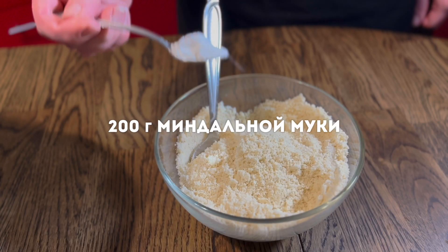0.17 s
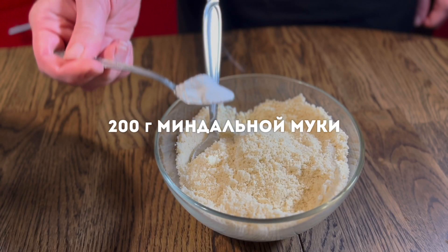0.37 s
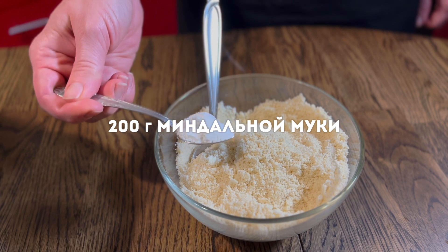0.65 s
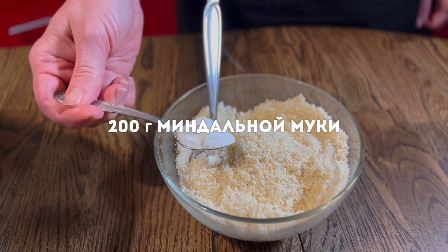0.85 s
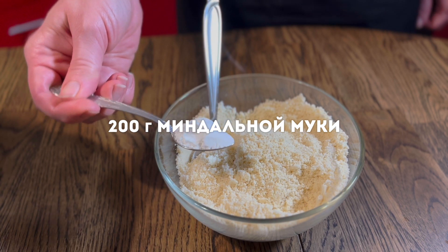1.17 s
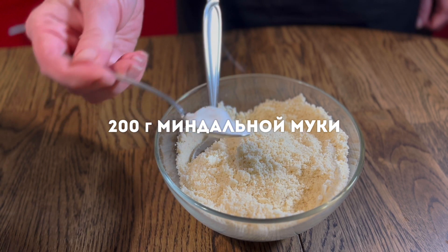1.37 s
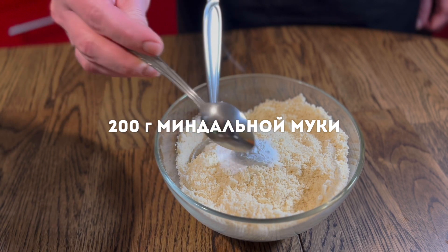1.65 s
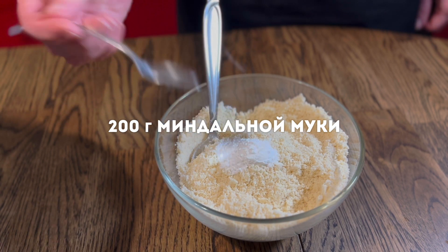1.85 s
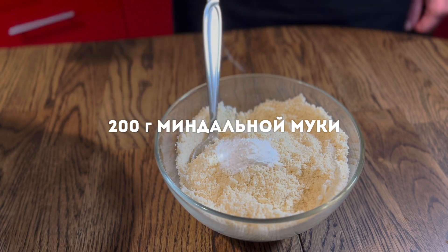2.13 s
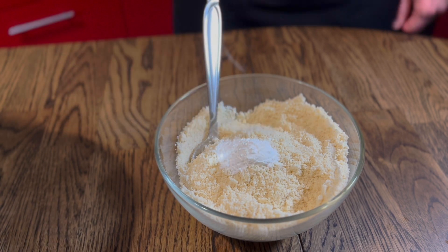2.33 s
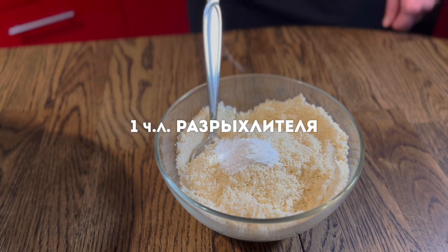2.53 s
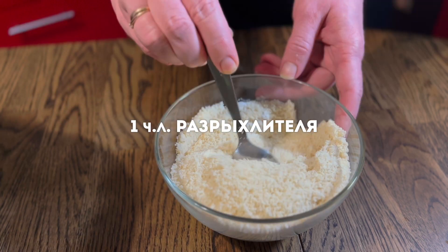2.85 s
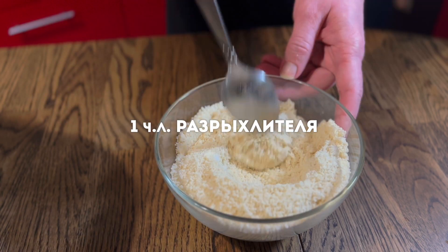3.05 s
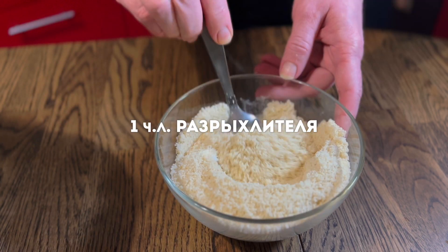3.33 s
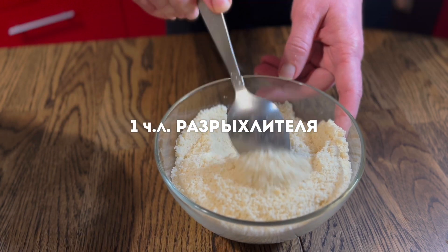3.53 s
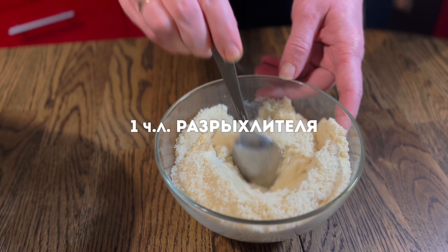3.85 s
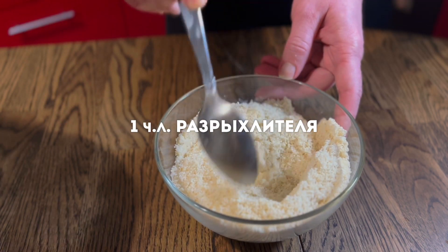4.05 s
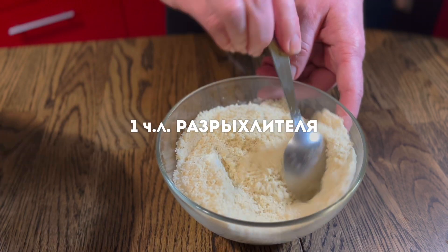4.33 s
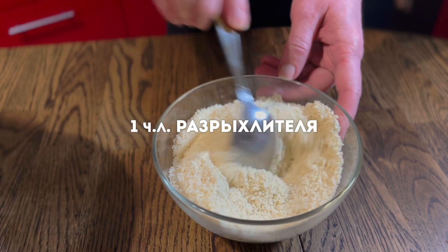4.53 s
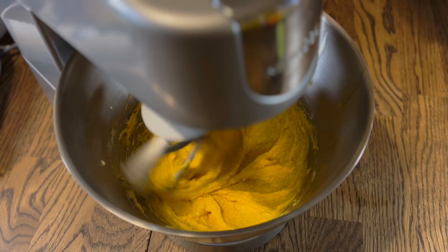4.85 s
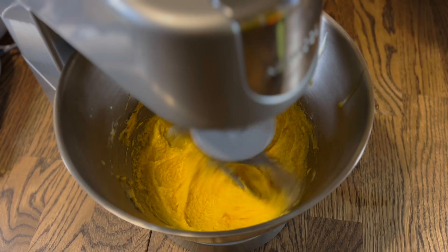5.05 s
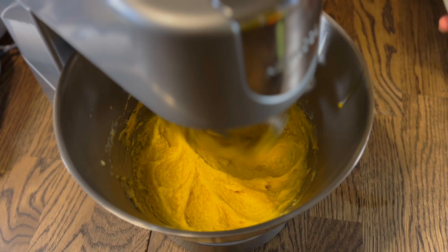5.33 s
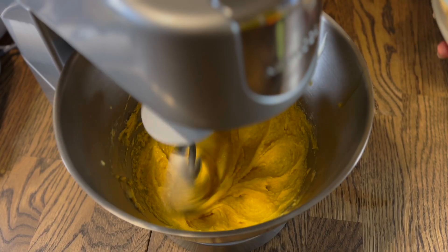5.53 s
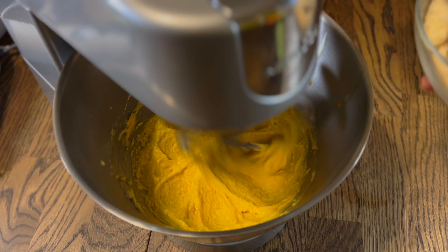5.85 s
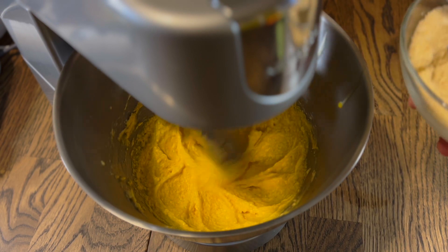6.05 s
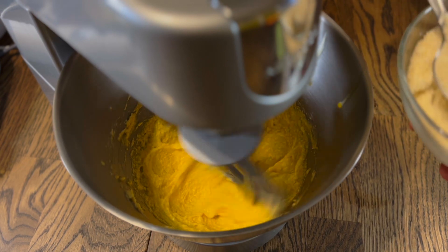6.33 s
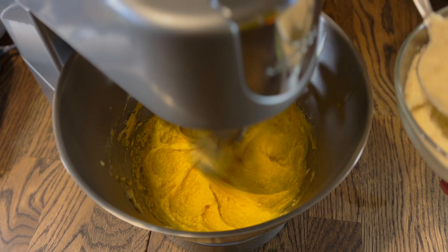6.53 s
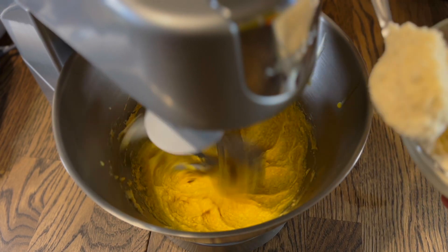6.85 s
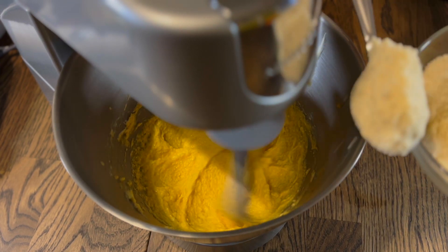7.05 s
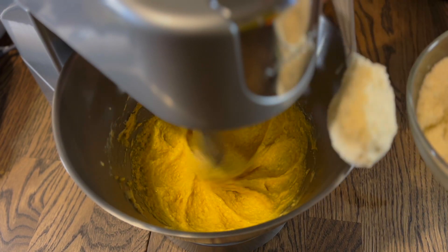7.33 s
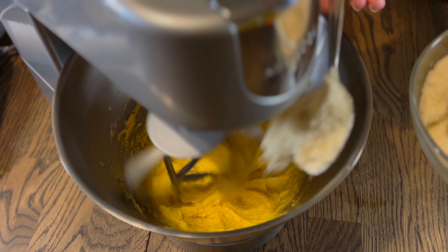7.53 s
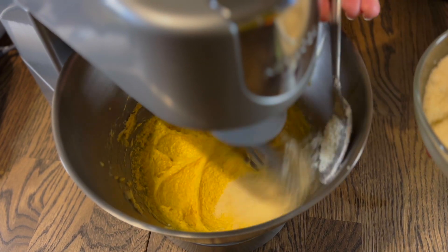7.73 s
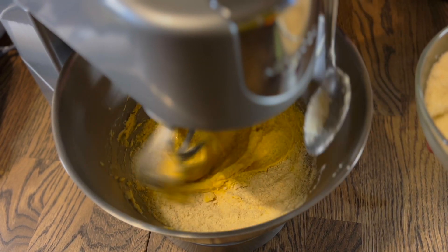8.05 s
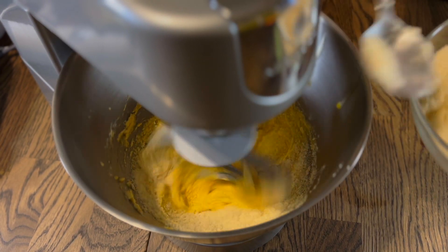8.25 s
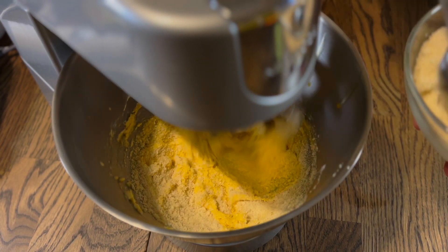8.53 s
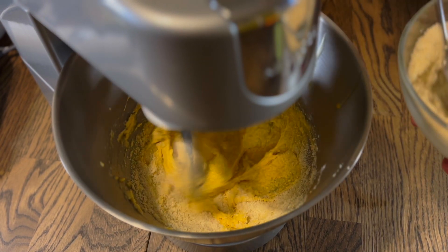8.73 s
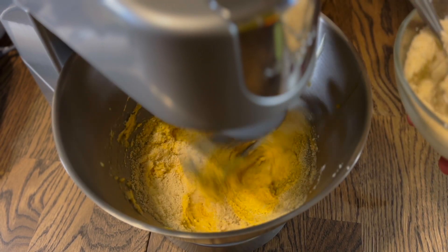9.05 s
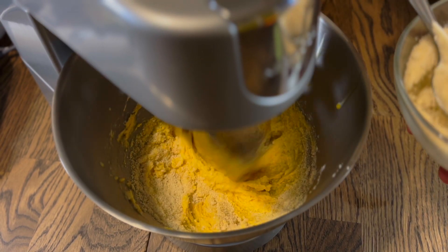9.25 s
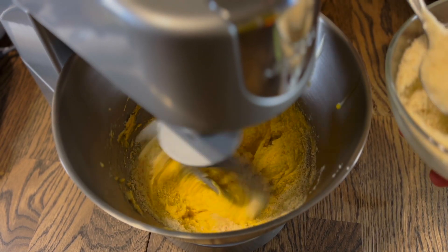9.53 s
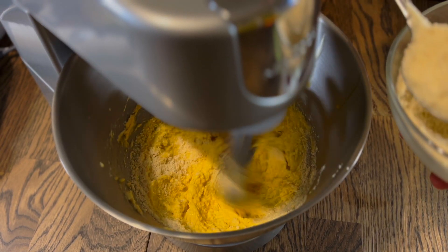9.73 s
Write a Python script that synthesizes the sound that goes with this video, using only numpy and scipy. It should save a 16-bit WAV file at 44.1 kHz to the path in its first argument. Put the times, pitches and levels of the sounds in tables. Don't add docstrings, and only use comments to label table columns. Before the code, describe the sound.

A steady mixer motor hums across the table, slightly roomy, while sparse glassy clacks, a dull knock and a bright crack come from a spoon stirring in a glass bowl. Midway the view switches suddenly to the mixer itself, close and strong, its whine and rough roar wavering under the load of batter. Thin spoon ticks on the steel rim occasionally poke through. Short indoor kitchen reverberation throughout.

```python
import sys
import numpy as np
from scipy import signal
from scipy.fft import rfft, irfft, next_fast_len
from scipy.io import wavfile
from scipy.ndimage import map_coordinates

SR = 44100
rng = np.random.default_rng(int(sys.argv[2]) if len(sys.argv) > 2 else 0)


def persist_wave(psi):
    counts = np.round(np.clip(psi, -1, 1) * 32767).astype(np.int16)
    wavfile.write(sys.argv[1], SR, np.atleast_2d(counts).T)


def voltage_ratio(level):
    return 10 ** (np.asarray(level, float) / 20)


N = 435686


def along(points, hz):
    f, *cols = np.transpose(points)
    return [np.interp(np.log(hz + 1), np.log(f + 1), c) for c in cols]


def wobble(rate_hz):
    knots = rng.standard_normal(int(N * rate_hz / SR) + 4)
    return map_coordinates(knots, [np.arange(N) * rate_hz / SR])


def sway(rate_hz, crest_s):
    return np.cos(2 * np.pi * rate_hz * (np.arange(N) / SR - crest_s))


def filtered(x, response):
    m = next_fast_len(N + SR // 2)
    return irfft(rfft(x, m) * response(np.fft.rfftfreq(m, 1 / SR)), m)[..., :N]


def tone(hz, db, flutter_db):
    phase = 2 * np.pi * (np.cumsum(hz) / SR + rng.random())
    return np.sqrt(2) * voltage_ratio(db + flutter_db * wobble(14)) * np.sin(phase)


def mixer(speed, spin_hz, boom, swells, orders, gears, roar, body,
          hunt, hunt_rate_hz, flutter_db, gate, throb_db, lumpy_db, spin_db):
    orbit_hz = 1.525
    blade_load = 0.0026
    t = np.arange(N) / SR
    turns_hz = np.interp(t, *np.transpose(speed)) * (1 + hunt * wobble(hunt_rate_hz))
    turns_hz *= 1 + blade_load * (np.sin(2 * np.pi * 9.2 * t) + np.sin(2 * np.pi * 12.1 * t))

    def swell_db(hz):
        return sum(db * sway(per_round * orbit_hz, crest_s)
                   for centre_hz, per_round, db, crest_s in swells if abs(np.log(hz / centre_hz)) < .02)

    whine = sum(tone(round(k) * turns_hz, db + swell_db(round(k) * turns_hz[-1]), flutter_db * np.sqrt(k / 19))
                for k, db in orders)
    growl = sum(tone(hz + drift_hz * wobble(12), db + swell_db(hz), shake_db)
                for hz, db, drift_hz, shake_db in gears)

    noise = rng.standard_normal((3, N)) * voltage_ratio(throb_db * wobble(20))
    noise[0] *= 1 + gate * np.sin(2 * np.pi * np.cumsum(turns_hz) / SR)

    def colour(f):
        lift = 1 + sum(voltage_ratio(db) ** 2 / (1 + ((f - hz) / (width_hz / 2)) ** 2) ** 2 for hz, width_hz, db in body)
        return voltage_ratio(along(roar, f)[0]) * np.sqrt(lift * SR / 2)

    sound = np.vstack([whine + growl, filtered(noise, colour)])
    boom_db = sum(db * sway(k * spin_hz, crest_s) for k, db, crest_s in boom) + lumpy_db * wobble(11)
    housing = filtered(sound, lambda f: np.exp(-((f - 435) / 105) ** 4))
    return (sound + (voltage_ratio(boom_db) - 1) * housing) * voltage_ratio(spin_db * sway(spin_hz, boom[0][2]))


def kitchen(x):
    # (frequency [Hz], t60 [s])
    decay = [(200, 0.36), (2000, 0.36), (10000, 0.11)]
    hz, t, z = signal.stft(rng.standard_normal((2, SR // 2)), SR, nperseg=256)
    t60_s = along(decay, hz)[0][:, None]
    tail = signal.istft(z * voltage_ratio(-60 * t / t60_s), SR, nperseg=256)[1]
    tail = tail / np.linalg.norm(tail[0])
    return signal.fftconvolve(np.pad(x, (200, 0))[None], tail, axes=1)[:, :N]


def heard(x, room, ports):
    # (frequency [Hz], left over right [dB], right leads by [rad], room share [dB])
    treble = [(7890, 1.5, -3.5, -16.5), (9490, 1, -2.5, -9.5), (10220, -1, -0.5, -7), (12900, 0, 1, -22),
              (14600, 0, 1.5, -13), (16000, 0, 6.5, -11)]
    ports = np.vstack([ports, treble])
    half = np.array([[.5], [-.5]])

    def share(f):
        return 1 / (1 + voltage_ratio(-along(ports, f)[2]) ** 2)

    def tilt(f):
        return voltage_ratio(half * along(ports, f)[0])

    def lead(f):
        return np.exp(-1j * half * np.interp(f, *np.transpose(ports)[[0, 2]]))

    direct = filtered(x, lambda f: tilt(f) * np.sqrt(1 - share(f)) * lead(f))
    return direct + filtered(room, lambda f: tilt(f) * np.sqrt(share(f)))


def placed(sound, ports, standing_rad):
    tones, roar, scattered = sound[0], sound[1], sound[2:]
    room = kitchen(tones + np.sin(standing_rad) * roar) + np.cos(standing_rad) * scattered
    return heard(tones + roar, room, ports)


def far_mixer():
    # (time [s], speed [turns/s])
    speed = [(0, 102.6), (1.2, 102.2), (2.4, 102), (3.6, 101.7), (4.8, 102.2)]
    # (rate [booms/turn], depth [dB], crest [s])
    boom = [(1, 0.79, 2.36), (0.13, 1, 2.27)]
    # (tone [Hz], rate [swells/round], depth [dB], crest [s])
    swells = [(165.3, 0.41, 2.2, 2.41), (303, 0.42, 2.7, 2.84), (397.7, 0.45, 1.7, 2.2)]
    # (multiple [turns], level [dB rms])
    orders = [(1, -59), (4, -54), (11, -56), (12, -51.5), (17, -56), (18, -65), (19, -46.5), (20, -50.5),
              (21, -53.5)]
    # (frequency [Hz], level [dB rms], pitch drift [Hz], flutter [dB])
    gears = [(99.7, -42.5, 0.079, 0.68), (115.3, -55.5, 0.46, 2), (134.2, -51, 0.67, 2),
             (149.8, -50, 2, 3.5), (165.9, -49.5, 0.33, 1.8), (179.6, -56.5, 0.35, 1.5),
             (196.6, -52.5, 1.17, 2.7), (304, -54, 0.072, 0.77), (320.7, -52.5, 1.25, 3),
             (399.6, -48.5, 0.12, 0.9), (428.4, -47.5, 0.79, 1.3), (443.8, -49, 0.66, 2.3),
             (497, -59, 0.95, 2), (591, -61, 3.7, 5.6), (673, -56.5, 5.9, 2.7), (861.6, -57.5, 4.9, 3),
             (1305, -53, 6.1, 3.6), (1405, -50, 6.4, 5.5), (1584, -61, 5.66, 3), (2173, -57, 14, 3.9)]
    # (frequency [Hz], density [dB/Hz])
    roar = [(25, -100), (60, -67), (230, -74), (560, -72), (950, -76), (1450, -73.5), (2200, -81),
            (2500, -85), (4000, -88.5), (5100, -94.5), (6400, -95.5), (10000, -100), (12500, -106),
            (15500, -109)]
    # (frequency [Hz], width [Hz], lift [dB])
    body = [(87, 31, 5.4), (296, 60, 7.7), (450, 90, 12.8), (1118, 158, 9.2), (1764, 230, 5.8),
            (1926, 220, 12.3), (3200, 290, 1.8), (4580, 870, 3.7), (5500, 450, 3.7), (6770, 680, 5.5)]
    # (frequency [Hz], left over right [dB], right leads by [rad], room share [dB])
    ports = [(100, 0, 0, -20), (450, 2.5, -1.2, -8), (750, 3, -2.2, 2), (1200, 4, -3.2, -3),
             (1500, -2, -3.8, -6), (1950, 7, -6.6, -13), (2700, 5, -6.7, 2), (3200, 4, -7.7, -3),
             (4000, 6, -7.5, 3), (4600, 9, -7, -3), (5700, -1, -4.8, 2)]
    sound = mixer(speed, 4.97, boom, swells, orders, gears, roar, body,
                  hunt=0.01234, hunt_rate_hz=55, flutter_db=1.5, gate=0.14,
                  throb_db=0.2, lumpy_db=1.0, spin_db=0.22)
    return placed(sound, ports, standing_rad=0.78)


def ring(modes, t, tilt_db=0, pivot_hz=200):
    scatter_db = rng.normal(0, 1, len(modes))
    return sum(voltage_ratio(db + d + tilt_db * np.log2(hz / pivot_hz) - 60 * t / t60_s) * np.sin(2 * np.pi * hz * t)
               for (hz, db, t60_s), d in zip(modes, scatter_db))


def spoon(contacts, bowl):
    # (frequency [Hz], level [dB], t60 [s])
    spoon_modes = [(1330, 0, 0.03), (1464, -2.5, 0.039), (2620, 3, .024), (3960, -5, 0.02), (5980, 0, .02),
                   (9500, -6, 0.017), (10860, -13, .03), (13600, -10, .015)]
    crack_t60_s, brighten_db = .015, -2
    out, t = np.zeros(N + SR), np.arange(SR // 4) / SR
    for s, db, bowl_db, spoon_db, hz in contacts:
        tilt_db = brighten_db * np.log2(hz / 3200)
        band = signal.butter(3, [hz / 2.7, min(hz * 2.2, SR * .45)], "band", fs=SR)
        crack = signal.lfilter(*band, voltage_ratio(-60 * t / crack_t60_s) * rng.standard_normal(len(t)))
        bowl_ring = voltage_ratio(bowl_db) * ring(bowl, t, tilt_db, 6400)
        spoon_ring = voltage_ratio(spoon_db) * ring(spoon_modes, t, tilt_db, 2100)
        onset = 1 - np.exp(-t / 0.00042)
        out[round(s * SR):][:len(t)] += voltage_ratio(db) * (crack + bowl_ring + spoon_ring) * onset
    return out[:N]


def stir_glass():
    # (time [s], peak [dB], glass ring [dB], spoon ring [dB], crack centre [Hz])
    stir = [
        (2.7994, -43, -30, -30, 8000),
        (3.1737, -10.5, -13.5, -18.5, 3500),
        (3.3326, -14.5, -50, -35, 750),
        (4.1704, -14.5, -40, -6, 3200),
        (4.1774, -16, -26, -12.5, 2200),
        (4.7601, -7, -32, -19, 6200),
    ]
    # (frequency [Hz], level [dB], t60 [s])
    glass = [(2250, 5, .028), (2966, -5.5, .24), (4511, -11, .08), (5000, -3, .03), (6358, -13, .05),
             (9500, 1, .045), (10820, -9, .09), (11900, -7, .06), (13120, -12, .04)]
    return spoon(stir, glass)


def table_thuds():
    # (time [s], level [dB], hardness [dB/octave])
    thuds = [
        (2.80, -32, -1),
        (2.835, -27.5, -4),
        (2.95, -36, -2),
        (3.175, -29.5, 4),
        (3.334, -25.5, 1.5),
        (3.57, -39, 2.5),
        (4.176, -26, 3.5),
        (4.7605, -29.5, 5),
    ]
    # (frequency [Hz], level [dB], t60 [s])
    board = [(63, -9, 0.11), (117, -2, 0.15), (235, 0, 0.1), (297, -6, 0.06), (472, -0.5, 0.046),
             (623, -7.5, 0.082)]
    puff_hz, puff_db, puff_t60_s = 700, 14, 0.038
    out, t = np.zeros(N + SR), np.arange(SR // 4) / SR
    lowpass = signal.butter(2, puff_hz, fs=SR)
    for s, db, hard_db in thuds:
        puff = signal.lfilter(*lowpass, voltage_ratio(puff_db - 60 * t / puff_t60_s) * rng.standard_normal(len(t)))
        onset = 1 - np.exp(-t / 0.0022)
        out[round(s * SR):][:len(t)] += voltage_ratio(db) * (ring(board, t, hard_db) + puff) * onset
    return out[:N]


def loaded_speed():
    # (time [s], speed lost [turns/s])
    digs = np.array([(4.93, 1.5), (5.22, 1.32), (5.46, 1.47), (5.79, 1.37), (6.04, 2.03), (6.14, 0.99),
                     (6.4, 1.08), (6.82, 1.33), (7.05, 1.4), (7.26, 1.34), (7.36, 2.13), (7.46, 1.214),
                     (7.71, 1.787), (8.11, 1.4), (8.43, 1.44), (8.69, 2.2), (8.86, 1), (8.93, 1.42),
                     (9.2, 1.27), (9.44, 1.94), (9.68, 1.7), (9.9, 0.96)])
    free_turns_hz, sag_s, recover_s = 104.1, .11, .02
    t = np.arange(0, N / SR + .01, .002)
    late_s = t[:, None] - digs[:, 0]
    drag = np.exp(-np.where(late_s < 0, -late_s / sag_s, late_s / recover_s))
    return np.transpose([t, free_turns_hz - drag @ digs[:, 1]])


def near_mixer():
    # (rate [booms/turn], depth [dB], crest [s])
    boom = [(1, -0.15, 8.5), (2.143, 1.1, 7.29), (0.0097, 0.54, 5.6)]
    # (tone [Hz], rate [swells/round], depth [dB], crest [s])
    swells = [(135.5, 0.516, 3, 6.76), (206.5, 1.8, 2.5, 7.2), (307, 2.05, 2.5, 7.08),
              (372.5, 0.97, 5, 7.44), (372.5, 2.057, 3, 7.43), (413, 0.983, 5.5, 7.03), (413, .08, 2, 5.5),
              (456.3, 4.413, 6, 7.04), (456.3, 9.46, 4, 7.21), (475.7, 4.413, 0.5, 8),
              (562, 1.02, 3.5, 7.47), (562, 2, 0.5, 7.46)]
    # (multiple [turns], level [dB rms])
    orders = [(1, -38.5), (3, -42.5), (4, -38.5), (8, -54), (11, -58), (13, -53.5), (17, -52.5),
              (18, -53.5), (19, -34), (20, -41), (21, -54.5), (23, -63), (24, -47.5), (27, -54)]
    # (frequency [Hz], level [dB rms], pitch drift [Hz], flutter [dB])
    gears = [(99.5, -55, 0.063, 3.5), (113.4, -55.5, .6, 7), (135.5, -40.5, 0.66, 3),
             (206, -53.5, 0.88, 1.5), (273.4, -56, 1.2, 2), (286, -49.5, 0.99, 3.5),
             (300.7, -41.5, 0.12, -2.3), (371.3, -42.5, 2.08, 3), (398, -49, 0.14, 5),
             (456.3, -37, 3.006, 0.5), (479.3, -40.5, 2.99, 4.5), (564, -41, 0.96, 1.3),
             (881, -53.5, 7.96, 3), (1853, -52.5, 5.05, 5.5), (4440, -59.5, 13, 1.5), (5440, -65, 14, 7.5),
             (5670, -60, 14, 4), (6240, -63, 10.1, 5)]
    # (frequency [Hz], density [dB/Hz])
    roar = [(25, -106), (60, -64), (200, -69.5), (600, -68.5), (900, -69), (1000, -70), (1400, -72),
            (2300, -69), (3500, -82), (5200, -80), (7000, -80.5), (9500, -86.5), (14000, -94.5),
            (15500, -96)]
    # (frequency [Hz], width [Hz], lift [dB])
    body = [(291, 71, 9.5), (439, 107, 17.5), (1574, 270, 7.5), (2000, 155, 10), (2517, 130, 8),
            (4390, 760, 6), (5120, 65, -2), (5460, 100, 6), (5740, 380, 3.5), (6200, 79, 3), (9850, 210, 8),
            (10500, 370, 3.5)]
    # (frequency [Hz], left over right [dB], right leads by [rad], room share [dB])
    ports = [(100, -.8, -.15, -22), (450, 1.5, -.4, -13), (900, 6, -.5, -2), (1250, 2, -.5, 0),
             (1550, -1, -3.5, -8), (1950, 0, -6.8, -12), (2600, 2, -7.5, -5), (3400, 4, -7.3, 3),
             (4300, 6, -6.8, -4), (5000, 2, -6.8, 2), (5900, 6, -5.4, -7)]
    sound = mixer(loaded_speed(), 6.73, boom, swells, orders, gears, roar, body,
                  hunt=0.002, hunt_rate_hz=24, flutter_db=1.2, gate=0.078,
                  throb_db=0.52, lumpy_db=0.58, spin_db=-0.16)
    return placed(sound, ports, standing_rad=0.67)


def tap_steel():
    # (time [s], peak [dB], steel ring [dB], spoon ring [dB], crack centre [Hz])
    tip = [
        (5.285, -26.5, -16, -30, 10500),
        (7.3906, -16.5, -9, -20, 3200),
        (7.607, -30, -7, -28, 6800),
        (8.6482, -26.5, -7, -22, 5010),
        (8.9406, -28, -12, -30, 10800),
    ]
    # (frequency [Hz], level [dB], t60 [s])
    steel = [(2450, 3, 0.025), (2720, -7, 0.027), (3050, -3, .025), (3570, -2.5, 0.059), (3930, -3, .035),
             (6670, 3.5, 0.027), (7370, 5, 0.025), (10600, -12, 0.043), (12100, -13, 0.022)]
    return spoon(tip, steel)


def scene():
    # (frequency [Hz], left over right [dB], right leads by [rad], room share [dB])
    spoon_ports = [(100, 1, -6.3, -12), (1500, 2, -6.5, -11), (3000, 3, -6.6, -17), (5500, 3, -5.8, -11)]
    change_s, fade_s = 4.805, 0.004
    close = np.clip((np.arange(N) / SR - change_s) / fade_s + .5, 0, 1)
    motor = (1 - close) * far_mixer() + close * near_mixer()
    hits = stir_glass() + table_thuds() + tap_steel()
    return motor + heard(hits, kitchen(hits), spoon_ports)


def low_pass(x):
    return signal.sosfilt(signal.butter(12, 15580, fs=SR, output="sos"), x)


def record(dry):
    mix = filtered(dry, lambda f: 1 / np.sqrt(1 + (42 / (f + 1)) ** 4))
    return low_pass(mix)


dry = scene()
out = record(dry)
persist_wave(out)
```